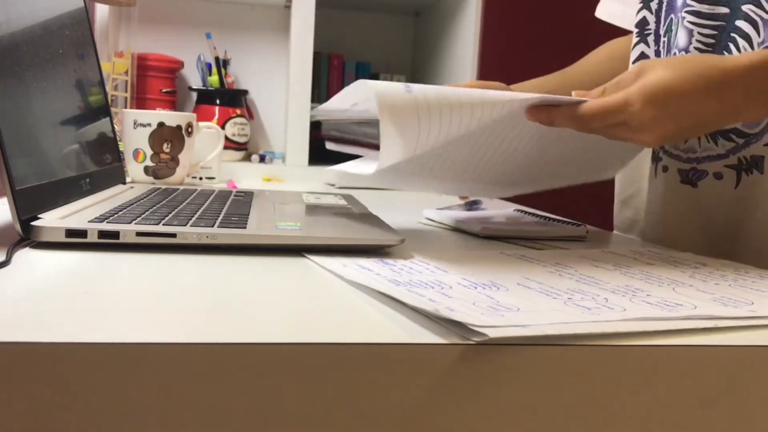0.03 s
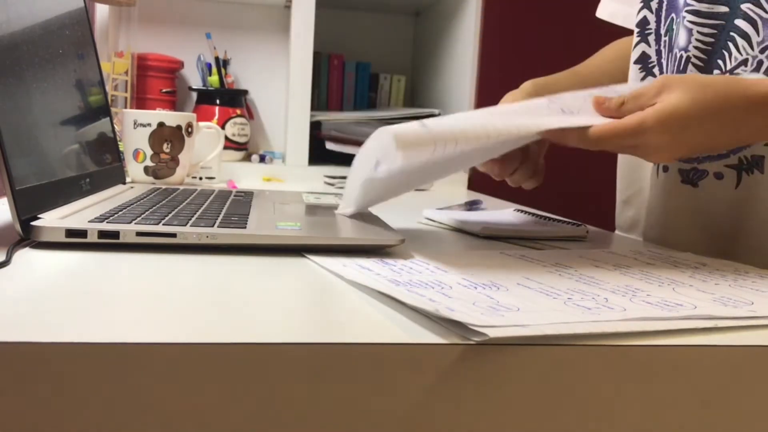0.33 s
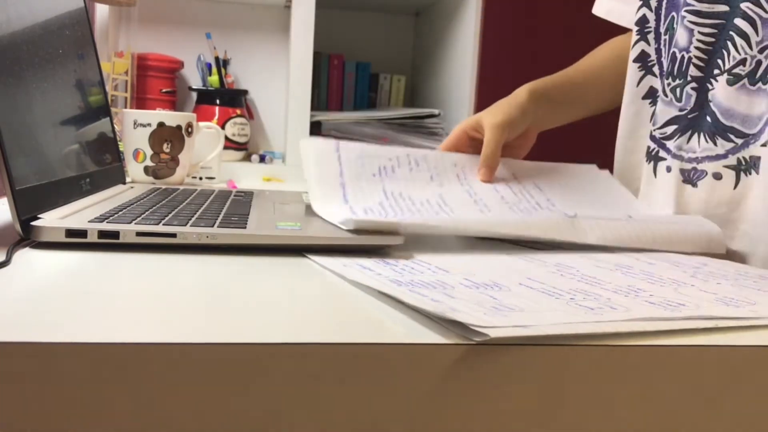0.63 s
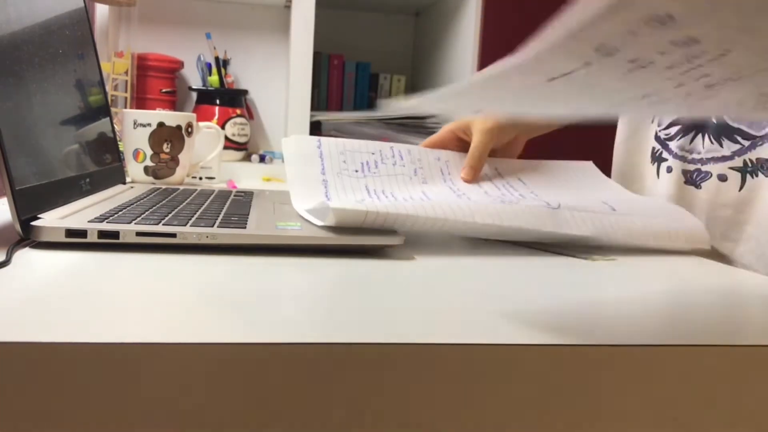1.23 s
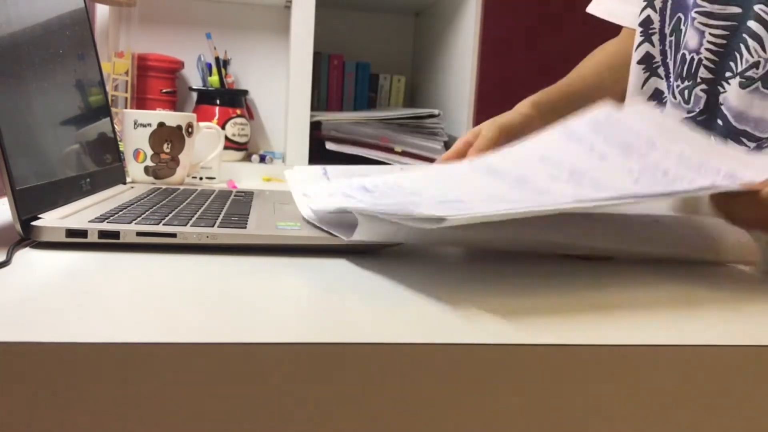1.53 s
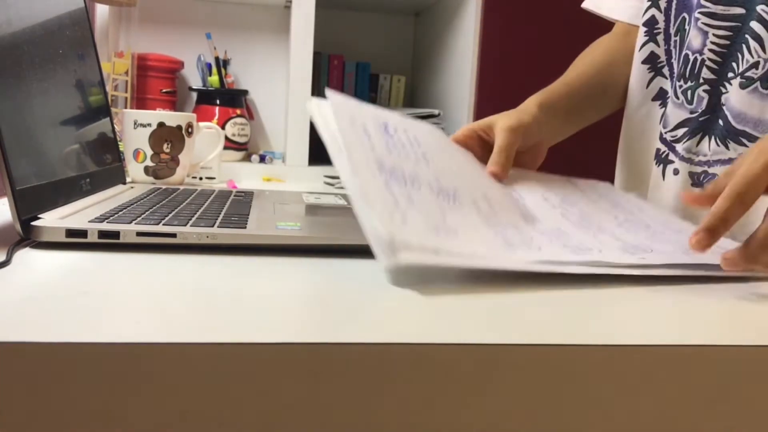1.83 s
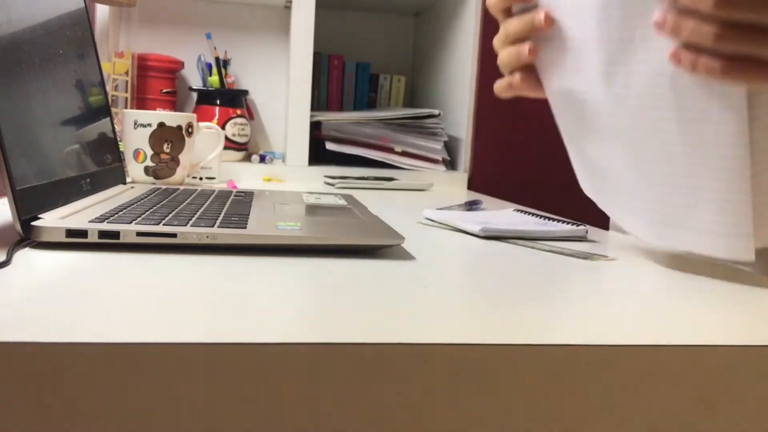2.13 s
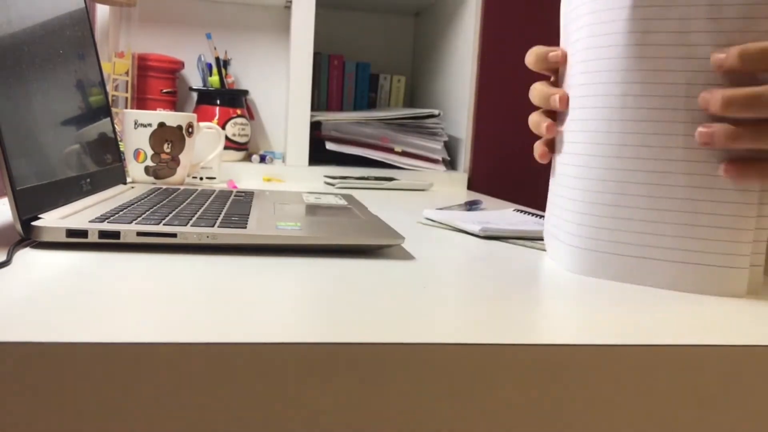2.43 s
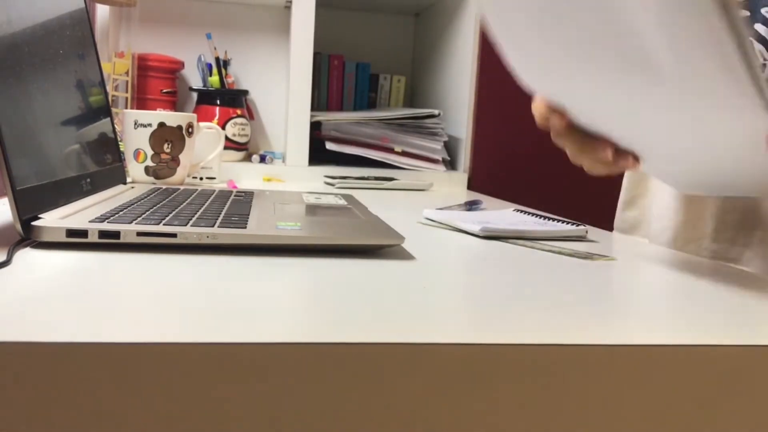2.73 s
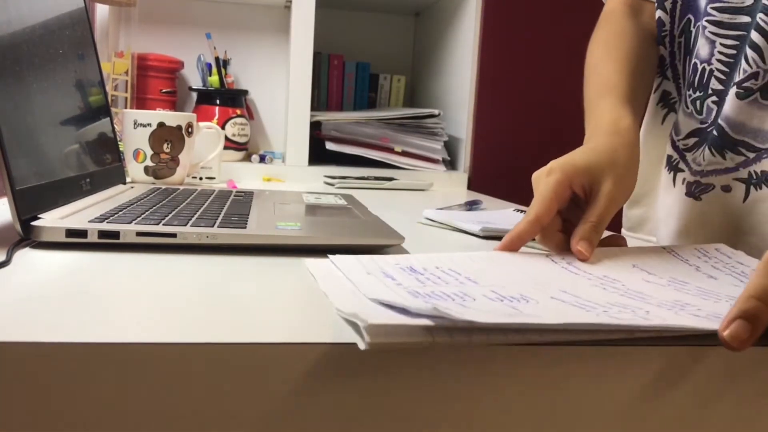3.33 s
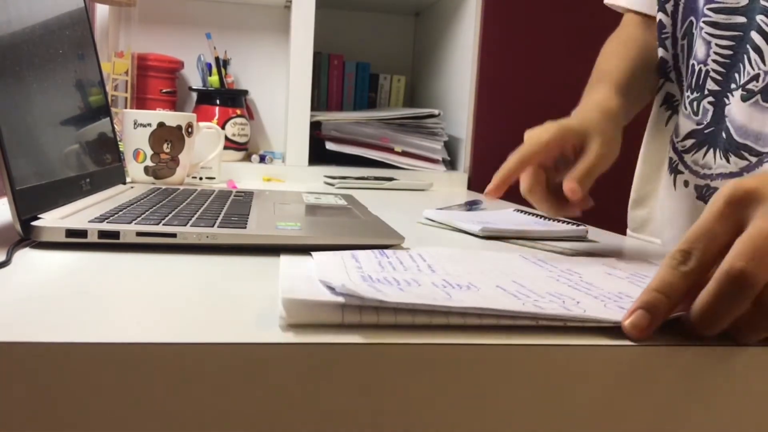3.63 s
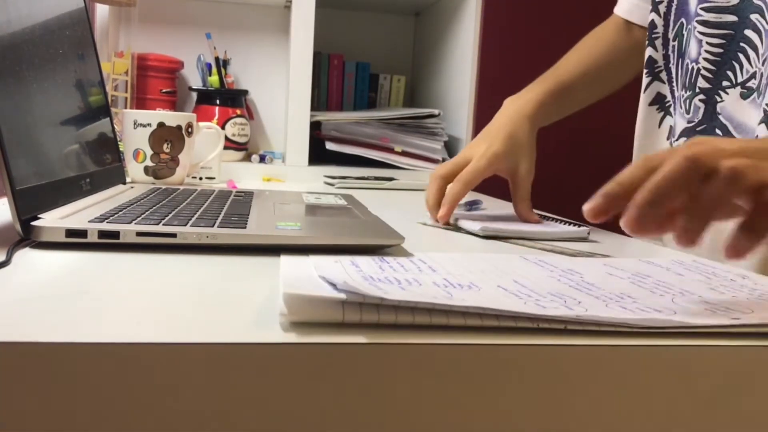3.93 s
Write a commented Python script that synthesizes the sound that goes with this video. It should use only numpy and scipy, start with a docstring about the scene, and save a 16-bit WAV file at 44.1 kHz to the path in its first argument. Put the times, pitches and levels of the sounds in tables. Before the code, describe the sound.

Paper sheets rustle as they are gathered and knocked once on a desk.

```python
"""A fan motor hums throughout in a small room. From the start, sheets of paper are gathered over
a desk: they crackle and snap as they buckle, and hiss as they slide and their fibres catch.
At 2.4 s the stack is knocked once on its edge and the desk top rings. The stack is then laid
down and pushed straight. At 3.9 s a hand bumps the desk."""
import sys
import numpy as np
from scipy import signal
from scipy.fft import rfft, irfft
from scipy.io import wavfile

SR = 44100
rng = np.random.default_rng(int(sys.argv[2]) if len(sys.argv) > 2 else 0)


def output_pcm(signal):
    """Save a mono or channel-first signal as 16-bit PCM at the path in sys.argv[1].

    Samples are clipped to [-1, 1] before scaling.
    """
    pcm = np.clip(np.atleast_2d(signal).T, -1, 1) * 32767
    wavfile.write(sys.argv[1], SR, np.round(pcm).astype(np.int16))


N = 176400

# Sheets bend (start [s], length [s], start level [dB], end level [dB], release [s], main pitch [Hz])
SHEET_BENDS = [(0, 0.18, -38.5, -46, .04, 1300), (0.207, 0.052, -39.5, -39, .035, 2200),
               (0.32, 0.039, -38, -37, 0.032, 2000), (0.393, 0.11, -38.5, -35, 0.019, 2600),
               (0.543, 0.077, -49, -43.5, .02, 4000), (0.622, 0.037, -38, -37.5, 0.027, 1700),
               (0.699, 0.028, -42, -41.5, .035, 1600), (1.079, 0.088, -43.5, -45, 0.018, 1200),
               (1.869, 0.053, -41, -43.5, .025, 1100), (2.04, 0.11, -42, -42.5, .05, 900),
               (2.267, 0.24, -44.5, -58, .01, 1500), (2.405, 0.068, -33.5, -36, 0.02, 3000),
               (2.638, 0.073, -57.5, -50, .03, 1200), (2.93, 0.069, -43, -51.5, .03, 1600),
               (3.811, 0.017, -46, -54, .015, 2300)]
# Sheets slide (start [s], length [s], start level [dB], end level [dB], attack [s], release [s])
SHEET_SLIDES = [(0, 0.059, -51, -52, 0.0033, 0.033), (0.311, .16, -49, -62, .01, .03),
                (0.526, 0.084, -46, -45, 0.024, .025), (0.69, 0.21, -48.5, -52, .01, 0.07),
                (0.939, .23, -51.5, -50, 0.018, 0.018), (1.176, 0.025, -50, -39, .005, 0.0025),
                (1.23, 0.21, -59, -55.5, .01, 0.018), (1.365, 0.31, -60.5, -48, .015, .02),
                (1.639, 0.14, -40.5, -49.5, 0.0037, 0.076), (1.837, 0.051, -48, -53.5, 0.0086, 0.064),
                (2.046, 0.071, -37.5, -35.5, 0.0062, 0.0059), (2.133, .055, -70, -59, .005, 0.14),
                (2.278, 0.25, -46, -41, 0.0033, .01), (2.555, 0.26, -53, -54, 0.035, 0.012),
                (2.83, 0.067, -60, -59.5, .01, 0.013), (2.933, 0.038, -38, -67, 0.0037, 0.051),
                (3.032, 0.17, -56, -64, 0.012, .03), (3.203, 0.026, -54, -53, 0.011, .09),
                (3.359, 0.11, -63, -48.5, 0.011, .01), (3.441, 0.17, -52, -51, .008, 0.041),
                (3.758, .05, -55, -63.5, 0.0085, 0.011)]
# A sheet snaps (time [s], level [dB], patch pitch [Hz], treble tilt [dB/octave], decay [s])
SHEET_SNAPS = [(.010, -36.5, 1510, -4.5, 0.0026), (.095, -36, 2860, 0, 0.006),
               (.1908, -28.5, 2720, 2, 0.0049), (0.232, -28, 2560, -0.5, 0.0087),
               (0.331, -30.5, 2260, -1.5, 0.015), (.400, -37, 2030, 1, 0.013),
               (.461, -28.5, 2450, 1.5, 0.0088), (0.476, -43, 3000, 2, .002), (.502, -38, 3200, -1, 0.0044),
               (.692, -35, 3660, 1.5, .004), (0.703, -34, 1690, -1, 0.0053),
               (.710, -36.5, 2150, -1.5, 0.0015), (1.132, -42.5, 1500, -4, 0.0028),
               (1.1411, -31, 1460, -4, 0.0023), (1.276, -36, 1670, -2, 0.0015),
               (1.355, -40.5, 2560, -2.5, 0.0058), (1.865, -36, 1150, -2, 0.0033),
               (1.882, -38, 800, -1, 0.0056), (2.056, -38.5, 2500, -3.5, 0.004),
               (2.076, -37.5, 700, -8, 0.008), (2.110, -34, 2310, 5, 0.0027),
               (2.165, -35.5, 1410, 3.5, 0.0039), (2.202, -42.5, 1530, -4.5, 0.0046),
               (2.275, -30, 4400, 6, 0.0057), (2.3594, -36, 1100, -10, 0.0017),
               (2.631, -41, 2970, -3, 0.0036), (2.683, -43.5, 2330, 1, 0.0041),
               (2.732, -39, 1935, 0, 0.0021), (2.938, -37, 2310, 0, 0.0064), (3.82, -39, 2560, -1, 0.0048),
               (3.935, -64, 6000, 11, .004)]
# Stack edges land (time [s], level [dB], treble tilt [dB/octave], sizzle [dB], decay [s], desk push [dB])
EDGE_LANDINGS = [(2.3868, -21.5, 1.3, -2, 0.0035, -30.5), (2.396, -13.5, 0.8, 6.5, .0022, -22.5),
                 (2.4126, -18.5, -3, 2, .004, -28.5), (2.4541, -21.5, -1.9, 1, 0.0019, -46),
                 (2.468, -23.5, 1, -10.5, .002, -53)]
# Desk top modes (frequency [Hz], level [dB], T60 [s])
DESK_MODES = [(123.4, -11, 0.36), (186.3, -11, 0.32), (372, 5, 0.27), (437, -7, 0.33), (591, -12.5, 0.41),
              (684, -16, 0.26), (760, -14, 0.21), (816, -13, 0.38), (985, -4.5, 0.21), (1270, -18, 0.34),
              (2000, -16, .28), (2330, -7, 0.37)]
# Hand on desk (time [s], level [dB], decay [s])
HAND_BUMPS = [(3.936, -32.5, 0.0047), (3.954, -40, 0.021), (3.983, -46, 0.01)]
# Fan motor partials (frequency [Hz], rms level [dB])
MOTOR_PARTIALS = [(47.95, -34), (96.4, -50.5), (145, -56), (300.5, -61), (482, -66.5)]
# Room decay (frequency [Hz], T60 [s])
ROOM_DECAY = [(100, 0.34), (400, 0.37), (1500, 0.37), (4000, 0.43), (9000, 0.37), (16000, 0.24)]
# Spectra of the sources and the room (frequency [Hz], gain [dB])
CRACKLE_SPECTRUM = [(100, -3.5), (300, -4), (600, -5.5), (900, -1.5), (1500, -2), (2700, -3), (4200, -9),
                    (6500, -15.5), (9000, -27), (15000, -29)]
HISS_SPECTRUM = [(150, 9.5), (500, -11), (1000, 7.5), (2000, 1.5), (4200, 3.5), (7000, 0), (9000, 1),
                 (10300, -3), (12000, 0.5), (15500, -4)]
SNAP_SPECTRUM = [(100, -28), (400, -7), (700, -7), (1000, -0.5), (2400, -1.5), (4500, -3.5), (7000, -11.5),
                 (10000, -22), (16000, -33.5)]
EDGE_SPECTRUM = [(80, -13), (150, -6), (250, -3.5), (400, -2.5), (520, -11), (750, -2.5), (1000, 5.5),
                 (1600, -7), (2200, -2), (3000, -1.5), (4500, -7), (6500, -8.5), (8200, -14), (11000, -16),
                 (16000, -18.5)]
BUMP_SPECTRUM = [(40, -14), (90, 0.5), (150, 3.5), (210, 3), (300, -6.5), (450, -18), (1200, -20),
                 (4000, -32.5), (16000, -40)]
AIR_SPECTRUM = [(20, -25), (45, -8), (75, 0), (110, 0), (180, -2.5), (260, -11), (400, -8.5), (800, -17.5),
                (2000, -25), (6000, -35.5), (10000, -41.5), (16000, -40)]
ROOM_SPECTRUM = [(100, 5.5), (1000, 2), (3000, -1.5), (8000, 0.5), (16000, 0.5)]

BINS_HZ = np.fft.rfftfreq(4096, 1 / SR)
TREBLE_OCTAVES = np.log2(np.maximum(BINS_HZ, 1000) / 1000)


def amp(db):
    """Decibels to gain."""
    return 10 ** (np.asarray(db) / 20)


def unit_rms(x):
    """Scales to rms 1."""
    return x / np.sqrt(np.mean(x ** 2) + 1e-20)


def curve(points, hz=BINS_HZ):
    """Interpolates a table over log frequency."""
    points_hz, values = np.transpose(points)
    return np.interp(np.log(hz + 1), np.log(points_hz + 1), values)


def add(mix, time_s, sound):
    """Mixes a sound in at time_s."""
    part = mix[max(round(time_s * SR), 0):][:len(sound)]
    part += sound[:len(part)]


def colour(x, gain_db):
    """Minimum-phase filter; gain_db lies on BINS_HZ."""
    log_gain = np.log(amp(np.r_[gain_db, gain_db[-2:0:-1]]))
    taps = np.fft.ifft(np.exp(np.conj(signal.hilbert(log_gain)))).real
    return signal.fftconvolve(x, taps[:len(gain_db)])[:len(x)]


def wander(rate_hz):
    """Slow random drift, rms 1."""
    hz = np.fft.rfftfreq(N, 1 / SR)
    lowpass = np.exp(-(hz / rate_hz) ** 2) * (hz > 0)
    return unit_rms(irfft(rfft(rng.standard_normal(N)) * lowpass, N))


def clicks(per_s, spread_db):
    """Random clicks, mostly small, a few large."""
    size = amp(spread_db * np.minimum(rng.exponential(1, N), 5))
    return size * rng.choice([-1, 1], N) * (rng.random(N) < per_s / SR)


def burst(level_db, decay_s, spectrum_db, rise_s):
    """Fast-dying flurry of clicks; level_db is its energy spread over 10 ms."""
    t = np.arange(SR // 8) / SR
    flurry = rng.choice([-1, 1], len(t)) * np.exp(-t / decay_s) * (1 - np.exp(-t / rise_s))
    sound = colour(flurry, spectrum_db)
    return amp(level_db) * sound / np.sqrt(np.sum(sound ** 2) / (SR / 100))


def stroke(start_s, length_s, from_db, to_db, attack_s, release_s):
    """Envelope of one hand movement: attack, sloping hold, release."""
    t = np.arange(N) / SR - start_s
    attack = 1 - np.exp(-np.maximum(t, 0) / attack_s)
    hold = amp(from_db + (to_db - from_db) * np.clip(t / length_s, 0, 1))
    release = np.exp(-np.minimum(np.maximum(t - length_s, 0) / release_s, 20))
    return attack * hold * release


def patch_db(hz, height_db, width_octaves=0.43):
    """Broad resonance of one patch of a sheet."""
    return height_db * np.exp(-(np.log2((BINS_HZ + 1) / hz) / width_octaves) ** 2)


def paper_crackle(gain_db=-0.5, buckles_per_s=5000, clump_db=2, falloff_db_per_octave=5, attack_s=0.002):
    """Patches of paper buckle in clumps of tiny clicks; each bend favours those near its pitch."""
    pitches_hz = np.geomspace(800, 6000, 8)
    patches = []
    for hz in pitches_hz:
        buckles = clicks(buckles_per_s / len(pitches_hz), spread_db=2.5)
        clumps = amp(clump_db * wander(rate_hz=31))
        patches.append(colour(buckles * clumps, curve(CRACKLE_SPECTRUM) + patch_db(hz, height_db=9)))
    out = np.zeros(N)
    for start_s, length_s, from_db, to_db, release_s, hz in SHEET_BENDS:
        weights = amp(-falloff_db_per_octave * abs(np.log2(pitches_hz / hz)))
        envelope = stroke(start_s, length_s, from_db, to_db, attack_s, release_s)
        out += unit_rms(weights @ np.array(patches)) * envelope
    return amp(gain_db) * out


def paper_hiss(gain_db=0.5, pressure_db=1.7):
    """Fibres catch under uneven pressure as a sheet slides on sheet or desk."""
    catches = colour(clicks(per_s=14000, spread_db=3), curve(HISS_SPECTRUM))
    pressure = amp(pressure_db * wander(rate_hz=30))
    envelope = np.sqrt(sum(stroke(*slide) ** 2 for slide in SHEET_SLIDES))
    return amp(gain_db) * unit_rms(catches * pressure) * envelope


def paper_snaps():
    """Larger buckles, each from its own resonant patch."""
    out = np.zeros(N)
    for time_s, level_db, hz, tilt, decay_s in SHEET_SNAPS:
        spectrum_db = curve(SNAP_SPECTRUM) + patch_db(hz, height_db=4.5) + tilt * TREBLE_OCTAVES
        add(out, time_s, burst(level_db, decay_s, spectrum_db, rise_s=0.2 * decay_s))
    return out


def stack_knock(sizzle_hz=8500):
    """The sheets land on edge in quick succession."""
    out = np.zeros(N)
    high_shelf = 1 / (1 + (sizzle_hz / (BINS_HZ + 1)) ** 6)
    for time_s, level_db, tilt, sizzle_db, decay_s, _ in EDGE_LANDINGS:
        spectrum_db = curve(EDGE_SPECTRUM) + tilt * TREBLE_OCTAVES + sizzle_db * high_shelf
        add(out, time_s, burst(level_db, decay_s, spectrum_db, rise_s=0.00034))
    return out


def desk_ring(rise_s=0.0045):
    """Each landing pushes the desk top, whose modes ring briefly."""
    t = np.arange(SR // 2) / SR
    modes = sum(amp(db - 60 * t / t60_s) * np.sin(2 * np.pi * hz * t) for hz, db, t60_s in DESK_MODES)
    ring = modes * (1 - np.exp(-t / rise_s))
    out = np.zeros(N)
    for time_s, *_, push_db in EDGE_LANDINGS:
        add(out, time_s, amp(push_db) * ring)
    return out


def hand_bumps():
    """A soft hand thuds on the desk."""
    out = np.zeros(N)
    for time_s, level_db, decay_s in HAND_BUMPS:
        add(out, time_s, burst(level_db, decay_s, curve(BUMP_SPECTRUM), rise_s=0.001))
    return out


def reflections(near_db=-13, near_decay_s=0.0032, near_per_s=3000, tail_db=-8.5, tail_per_s=4000):
    """Impulse response: close echoes off desk and shelves, then the room's short tail."""
    t = np.arange(SR // 2) / SR
    near = rng.standard_normal(len(t)) * (rng.random(len(t)) < near_per_s / SR)
    near *= (t > 0.001) * np.exp(-t / near_decay_s)
    taps = rng.choice([-1., 1.], len(t)) * (rng.random(len(t)) < tail_per_s / SR) * (t > 0.006)
    hz, frame_s, bands = signal.stft(taps, SR, nperseg=256)
    decay = amp(-60 * frame_s / curve(ROOM_DECAY, hz)[:, None])
    tail = signal.istft(bands * decay, SR, nperseg=256)[1][:len(t)]
    echoes = amp(near_db) * near / np.linalg.norm(near) + amp(tail_db) * tail / np.linalg.norm(tail)
    return colour(echoes, curve(ROOM_SPECTRUM))


def room(x, crossfade_hz=1.288):
    """Short room echo; two reflection patterns slowly crossfade to keep it smooth and uncoloured."""
    angle_rad = 2 * np.pi * crossfade_hz * np.arange(N) / SR
    shares = np.cos(angle_rad), np.sin(angle_rad)
    return sum(signal.fftconvolve(x * share, reflections())[:N] for share in shares)


def fan(waver_depth=0.077, fundamental_drift_rad=0.021, air_db=-50):
    """Wavering motor hum over a soft rush of air."""
    t = np.arange(N) / SR
    fundamental_hz = MOTOR_PARTIALS[0][0]
    hum = np.zeros(N)
    for hz, rms_db in MOTOR_PARTIALS:
        waver = 1 + waver_depth * wander(rate_hz=7.8)
        phase_rad = 2 * np.pi * (hz * t + rng.random())
        drift_rad = fundamental_drift_rad * hz / fundamental_hz * wander(rate_hz=1.3)
        hum += amp(rms_db) * np.sqrt(2) * waver * np.sin(phase_rad + drift_rad)
    air_gain = amp(curve(AIR_SPECTRUM, np.fft.rfftfreq(N, 1 / SR)))
    air = irfft(rfft(rng.standard_normal(N)) * air_gain, N)
    return hum + amp(air_db) * unit_rms(air)


def scene():
    """Paper and desk in the room, over the fan; mono."""
    handling = paper_crackle() + paper_hiss() + paper_snaps() + stack_knock() + hand_bumps()
    return (handling + room(handling) + desk_ring() + fan())[None]


def record(dry):
    """Soft peak limit, then low-pass."""
    ceiling, cutoff_hz = 0.85, 15850
    rounded = dry / (1 + (dry / ceiling) ** 6) ** (1 / 6)
    lowpass = signal.firwin(511, cutoff_hz, window=("kaiser", 9), fs=SR)
    return signal.oaconvolve(rounded, lowpass[None], "same")


dry = scene()
out = record(dry)
output_pcm(out)
```